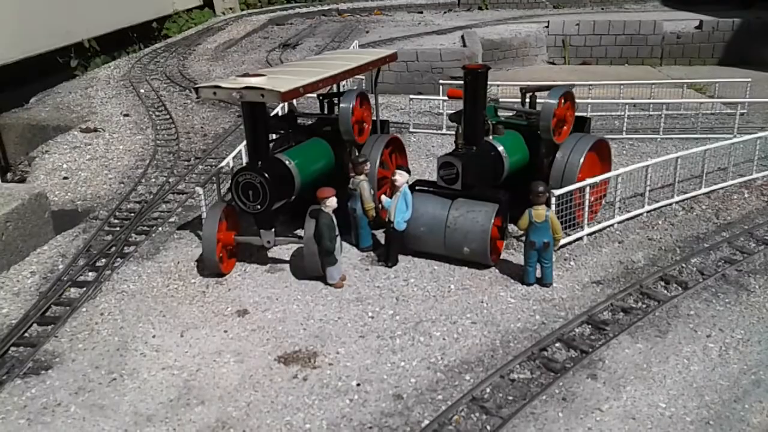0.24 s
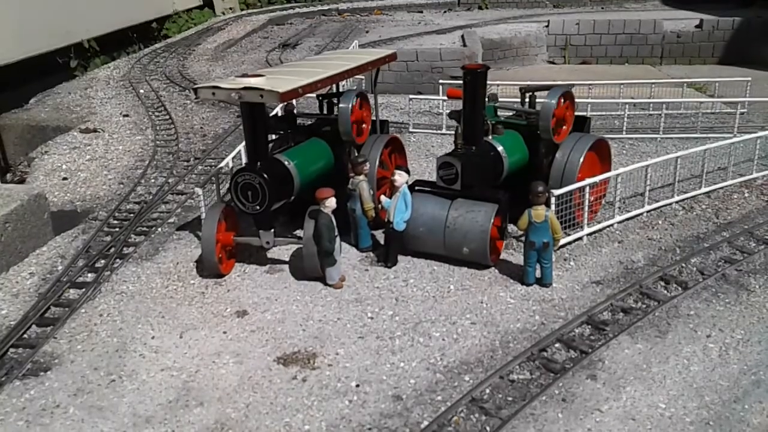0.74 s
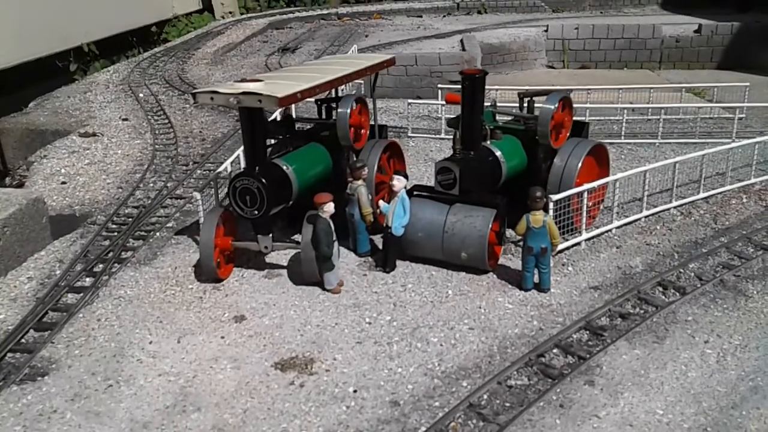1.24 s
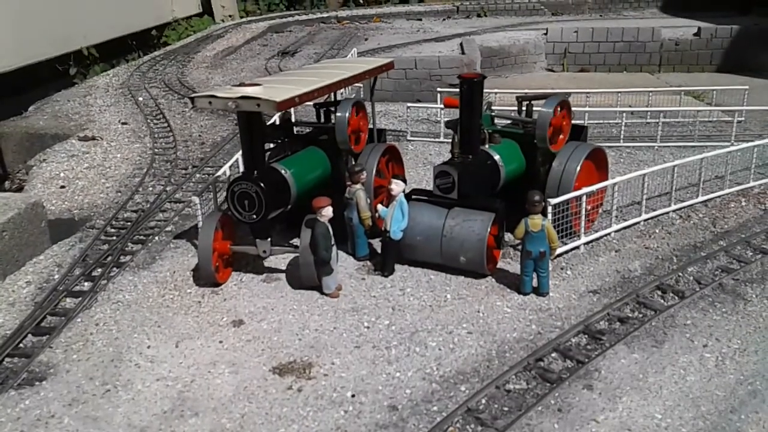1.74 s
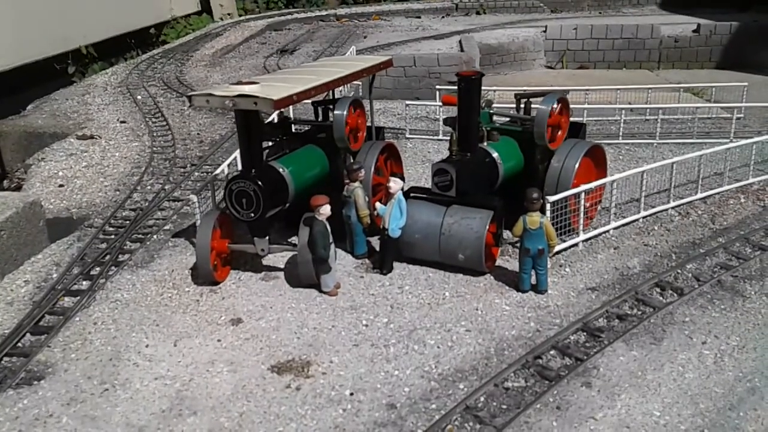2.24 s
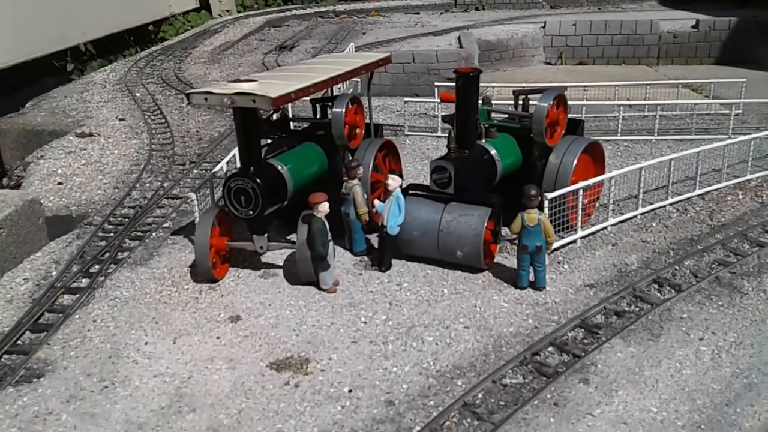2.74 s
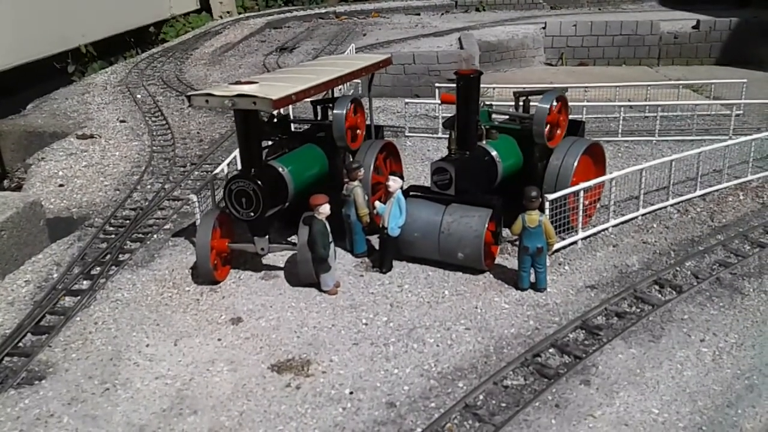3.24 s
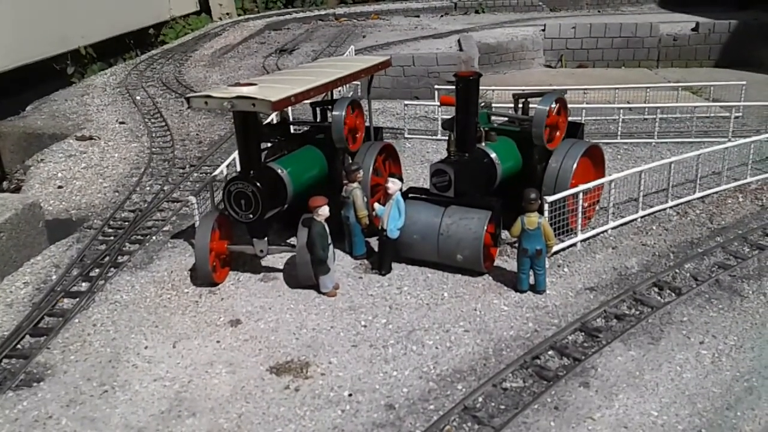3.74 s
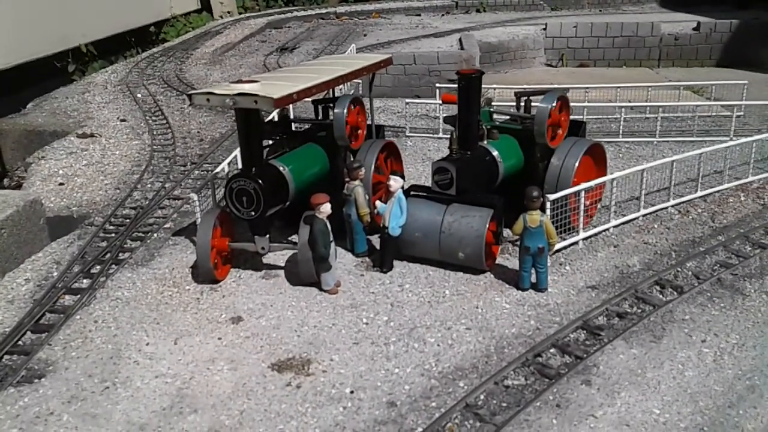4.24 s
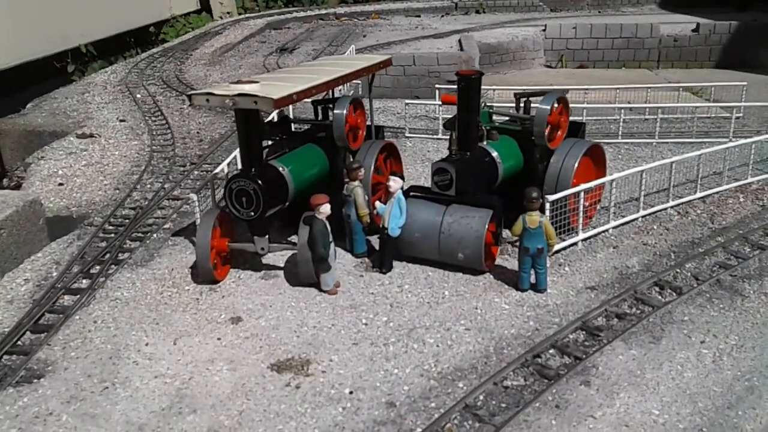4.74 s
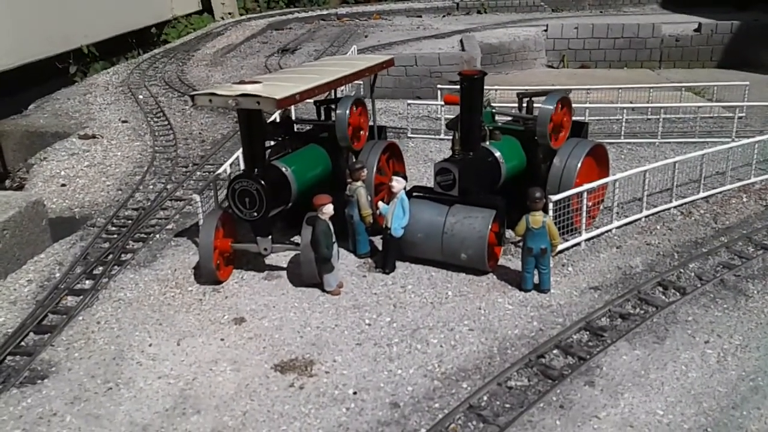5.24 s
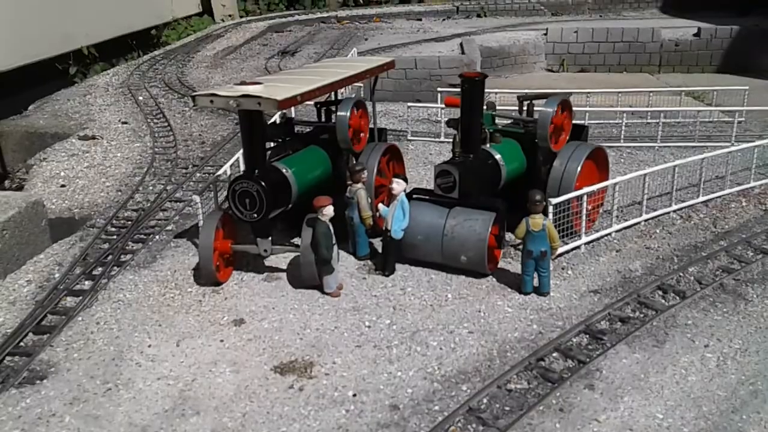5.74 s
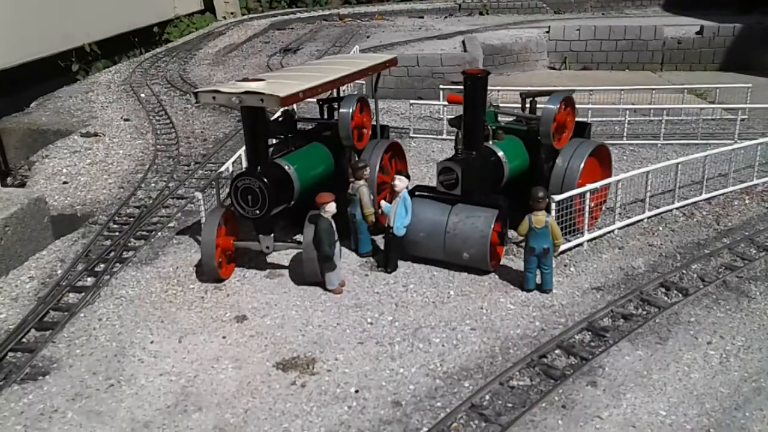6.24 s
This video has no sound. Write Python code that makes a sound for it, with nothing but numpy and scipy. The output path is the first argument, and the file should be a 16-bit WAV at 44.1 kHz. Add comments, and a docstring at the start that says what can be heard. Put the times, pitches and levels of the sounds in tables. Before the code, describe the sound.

Rapid metallic ticking and slower clacking knocks from two model steam engines over faint hiss, with wind thumps growing heavy toward the end.

```python
"""A slow live-steam model knocks and squeaks once a turn beside a fast one that ticks and thuds.
Both idle outdoors on gravel, close to one microphone: short contacts ring their metal parts.
Around them gears hum as sines locked to the flywheel, and steam leaks hiss as coloured noise.
Nearest of all, gusts roll eddies of air over the microphone as trains of pressure bumps."""
import sys
import numpy as np
from scipy import signal
from scipy.fft import rfft, irfft
from scipy.io import wavfile
from scipy.ndimage import uniform_filter1d

SR = 44100
rng = np.random.default_rng(int(sys.argv[2]) if len(sys.argv) > 2 else 0)


def put_to_file(sound):
    """Save the sound as 16-bit audio at rate SR, in the file named by the first command-line argument."""
    columns = np.atleast_2d(sound).T  # one column per channel
    safe = np.clip(columns, -1, 1)
    whole_steps = np.round(safe * 32767)
    wavfile.write(sys.argv[1], SR, whole_steps.astype(np.int16))


N = 285707


def undb(db):
    """Amplitude factor of a level in dB."""
    return 10 ** (np.asarray(db) / 20)


def level(x, db):
    """Scale a signal to an rms level in dB."""
    return x * undb(db) / np.sqrt(np.mean(x ** 2))


def clicks(s, size):
    """A sample-long click at each time."""
    out = np.zeros(N)
    at = np.round(np.asarray(s) * SR).astype(int)
    inside = (at >= 0) & (at < N)
    np.add.at(out, at[inside], size[inside])
    return out


def lag(x, ms):
    """One-pole smoothing that leaves the peak of a click at 1."""
    keep = np.exp(-1 / (SR * ms / 1000))
    return signal.lfilter([1], [1, -keep], x)


def contact(s, size, rise_ms, fall_ms, blow_db):
    """A clean blow, then rough chatter that swells and dies."""
    hits = clicks(s, size)
    swell = lag(hits, fall_ms) - lag(hits, min(rise_ms, .9 * fall_ms))
    chatter = swell * rng.standard_normal(N)
    return chatter + undb(blow_db) * hits


def ring(x, modes):
    """Sum of resonances, neighbours in opposite phase."""
    total = np.zeros(N)
    for k, (hz, width, db) in enumerate(modes):
        mode = signal.lfilter(*signal.iirpeak(hz, hz / width, SR), x)
        total += (-1) ** k * undb(db) * mode
    return total


def walk(rate):
    """Random levels held 1 / rate s and slewed twice; spread near 1."""
    k = int(SR / rate)
    held = np.repeat(rng.standard_normal(N // k + 1), k)
    slewed = uniform_filter1d(uniform_filter1d(held, k), k)
    return 1.3 * slewed[:N]


def bump(ms):
    """Pressure of one eddy as it passes: it builds slowly and breaks fast."""
    t = np.arange(-1500, 1501) / SR
    width_ms = ms * np.where(t < 0, 1.3, .7)
    return np.exp(-.5 * (t * 1000 / width_ms) ** 2)


def port(x):
    """The bass cut of the microphone turns a bump into a swing."""
    return signal.sosfilt(signal.butter(2, 95, "high", fs=SR, output="sos"), x)


def eddies(ms, spread_db, count):
    """A random train of pulls and pushes of one size, at 0 dB rms."""
    s, size, sign = rng.random((count, 3)).T
    strength = undb(-spread_db * np.log(size + 0.008))
    train = clicks(s * N / SR, strength * np.sign(sign - .6))  # more pulls than pushes
    return level(port(signal.fftconvolve(train, bump(ms), "same")), 0)


# breeze at the microphone between the slaps: (time [s], level of the large eddies [dB])
BREEZE = [(0.0, -34), (0.16, -42), (0.34, -41), (0.56, -49.5), (1.06, -51), (1.17, -49), (1.39, -66),
          (2.31, -70), (2.78, -57.5), (3.05, -49), (3.61, -50.5), (3.77, -41), (3.93, -47), (4.15, -52),
          (4.28, -24.5), (4.33, -27), (4.56, -29), (4.74, -30.5), (5.0, -43), (5.18, -28.5), (5.4, -23.5),
          (5.7, -30), (5.83, -39), (6.06, -39.5), (6.26, -35.5), (6.48, -34.5)]
# single strong eddies: (time [s], peak level before the bass cut [dB], size [ms])
SLAPS = [(0.0133, -16.5, 1), (0.137, -17, 0.87), (0.1811, -9.5, 0.69), (0.232, -18, .6), (0.263, -19, 0.37),
         (0.281, -12.5, 1.4), (0.309, -14, 0.85), (0.331, -26, 0.76), (0.8061, -9.5, 1.12),
         (0.783, -20, 1.5), (0.86, -20, 1.3), (0.885, -24, 2.3), (1.09, -28.5, 2), (1.22, -29.5, 1.4),
         (2.309, -30, 2.8), (2.82, -31.5, 3.4), (2.987, -12, 1.94), (3.084, -22, 2.7), (3.38, -25, 1.6),
         (3.6, -24, 2.4), (3.65, -26, 1.3), (3.705, -10, 1.56), (3.725, -17, 2), (3.761, -13.5, 1.18),
         (3.89, -23.5, 2.5), (4.1036, -13.5, 0.6), (4.2245, -7.5, 2.1), (4.3893, -3, 1.1),
         (4.411, -10.5, 1.04), (4.457, -13.5, 1.14), (4.5152, -11.5, 0.43), (4.634, -8, 1.4),
         (4.6557, -4.5, 1.17), (4.723, -5.5, 2.2), (4.76, -12, 1.8), (4.865, -19, 2.6), (4.931, -8.5, 2.5),
         (5.008, -5, 3.9), (5.108, -7, 2.7), (5.2102, -4, 2.1), (5.2307, -4, 1.2), (5.2815, -6.5, 0.86),
         (5.3102, -5, 1.27), (5.325, -5.5, 1.7), (5.373, -7, 1.75), (5.462, -3.5, 0.61),
         (5.471, -5.5, 0.75), (5.5256, -8.5, 1.8), (5.5462, -5.5, 1.33), (5.574, -3, 0.91),
         (5.7064, -6.5, 0.94), (5.7157, -14.5, 0.47), (5.77, -15.5, 1.5), (5.832, -11.5, 1.63),
         (5.919, -19, 2.4), (6.006, -12, 0.9), (6.058, -8.5, 1.27), (6.2228, -12.5, 0.8),
         (6.389, -15.5, 1.4)]
SMALL_DB, CALM_DB = -12.5, -57.5  # small eddies below the large ones in the breeze; their level in still air
# every slap rides on a burst of eddies, finer around a small slap
BURST_DB, BURST_RISE_DB_PER_S, BURST_FALL_DB_PER_S = -13.5, 798, 300
FINE_DB, FINE_DB_PER_DOUBLING = -6.5, -8  # small eddies of a 1 ms slap; change as its size doubles


def wind():
    """Random eddies ride the breeze and swell near each slap, but are turned down for a few ms around it."""
    t = np.arange(N) / SR
    large = undb(np.interp(t, *np.transpose(BREEZE)))
    small = large * undb(SMALL_DB) + undb(CALM_DB)
    pulls, dip = np.zeros((2, N + 3001))
    for at, db, ms in SLAPS:
        i = int(at * SR)
        pulls[i:i + 3001] -= undb(db) * bump(ms)  # the bump peaks 1500 samples in
        dip[i:i + 3001] += bump(7)
        slope = np.where(t < at, BURST_RISE_DB_PER_S, BURST_FALL_DB_PER_S)
        burst = undb(db + BURST_DB - slope * np.abs(t - at))
        fine_db = FINE_DB + FINE_DB_PER_DOUBLING * np.log2(ms)
        large = np.maximum(large, burst)
        small = np.maximum(small, burst * undb(fine_db))
    large_flow = eddies(2.46, 1.2, count=1200) * large
    small_flow = eddies(0.87, 2.16, count=1500) * small
    turned_down = undb(-9 * dip[1500:N + 1500])
    return (large_flow + small_flow) * turned_down + port(pulls[1500:N + 1500])


# colour of the leaking steam: (frequency [Hz], relative level [dB per Hz])
STEAM = [(18, -48), (30, 6), (100, -37), (319, -14), (400, -15.5), (620, -6.5), (730, -15), (1040, -10.5),
         (1150, -1), (1270, -11), (1630, -8.5), (2200, -18), (2900, -18), (5040, -11.5), (5900, -11.5),
         (7270, -3), (8740, -17.5), (11000, -28), (16000, -29)]
STEAM_DB = -44.5  # rms


def steam():
    """Leaks hiss unsteadily and spit droplets: noise with a wandering level and short bursts, coloured."""
    place, luck = rng.random((1500, 2)).T
    drop_db = -3 * np.log(luck + 0.011) - 14.5
    spit = lag(clicks(place * N / SR, undb(drop_db)), 2.55)
    jet = rng.standard_normal(N) * (undb(0.48 * walk(30)) + spit)
    hz, db = np.transpose(STEAM)
    bins_hz = np.fft.rfftfreq(N, 1 / SR)
    colour = undb(np.interp(np.log(bins_hz + 1), np.log(hz), db))
    return level(irfft(rfft(jet) * colour, N), STEAM_DB)


# run of the fast engine: (time [s], flywheel turns done [turns])
FAST_TURNS = [(0.0, -0.218), (0.4, 8.819), (1.2, 26.77), (1.6, 35.773), (2.4, 53.83), (3.2, 71.928),
              (4.0, 90.059), (5.2, 117.01), (5.6, 126.079), (6.0, 135.014), (6.5, 146.258)]
# its blows into the frame within one turn: (part of the turn [turns], level [dB])
FAST_BLOWS = [(-.17, -17), (-.065, -1), (.005, -6), (.13, -13), (.36, -17), (.55, -18)]
# its gear hums: (hums per turn [1/turn], mean level [dB])
GEAR = [(14, -61), (26, -67), (29, -67), (41, -68), (62, -65)]
# what its valve rings with: (frequency [Hz], width [Hz], level [dB])
FAST_VALVE = [(4180, 860, -11.5), (5740, 900, -5.5), (6910, 290, 6), (7604, 210, 8.5), (7828, 290, 4),
              (9000, 2000, -20), (11360, 300, -16), (14000, 680, -25)]
# what its frame rings with: (frequency [Hz], width [Hz], level [dB])
FAST_FRAME = [(123, 110, 0), (193, 99, -1.5), (552, 19, -6), (656, 8.3, -13), (841, 30, 1), (927, 7.6, -22),
              (1124, 35.6, 9.5), (1205.5, 61, 3), (1380, 18, -9), (1451, 108, -4.5), (1642, 72, -3.5),
              (1902, 127, -7.5), (3170, 67, -17)]


def fast_engine():
    """The valve ticks and rebounds; rod and crank strike the frame nearly alike every turn; the gears hum."""
    s, turns = np.transpose(FAST_TURNS)
    whole = np.arange(np.floor(turns[0]), turns[-1] + 1)
    chance = rng.standard_normal((len(whole), 3 + len(FAST_BLOWS))).T
    scatter_db = 1.2

    def when(part):
        """Times [s] of one part of every turn; -1 outside the run."""
        return np.interp(whole + part, turns, s, left=-1, right=-1)

    tick_db = -19.5 + 0.87 * chance[1]
    tick = contact(when(-0.14) + 0.00051 * chance[0], undb(tick_db), 0.19, 2.04, blow_db=3)
    rebound_db = -24.0 + 2 * scatter_db * chance[2]
    rebound = contact(when(-.045), undb(rebound_db), 0.49, 1.7, blow_db=9.5)
    blows = np.zeros(N)
    for (part, db), c in zip(FAST_BLOWS, chance[3:]):
        blows += clicks(when(part), undb(db + scatter_db * c))

    angle = 2 * np.pi * np.interp(np.arange(N) / SR, s, turns)
    gear = np.zeros(N)
    for order, db in GEAR:
        gear += np.sqrt(2) * undb(db + 0.26 * walk(3)) * np.sin(order * angle)
    return ring(tick + rebound, FAST_VALVE) + ring(blows, FAST_FRAME) + gear


# run of the slow engine, which knocks at each whole turn: (time [s], flywheel turns done [turns])
SLOW_TURNS = [(-0.035, -1), (0.3545, 5), (0.998, 15), (1.9455, 30), (2.572, 40), (2.887, 45), (3.206, 50),
              (3.851, 60), (4.4955, 70), (4.822, 75), (5.153, 80), (6.504, 100)]
# its harder knocks: (time [s], level above the rest [dB])
HARD_KNOCKS = [(0.095, 1), (1.441, 0.5), (1.631, 1), (2.008, 2.5), (2.698, 1.5), (3.915, 2), (4.045, 3),
               (5.22, 3), (6.167, 1.5)]
# extra squeaks of its rod, on top of the regular ones: (time [s], level [dB])
EXTRA_SQUEAKS = [(0.452, -15), (0.966, -8.5), (1.092, -17), (1.473, -14), (1.599, -6.5), (2.855, -15),
                 (4.333, -11), (5.186, -13), (5.796, -11)]
# what its frame rings with: (frequency [Hz], width [Hz], level [dB])
SLOW_FRAME = [(1160, 73, -1), (2145, 69, -10), (2590, 240, -15.5), (3301, 84, -3.5), (3654, 40, -5),
              (4110, 236, -6.5), (5164, 310, 3), (6210, 266, 1.5), (6580, 310, 4.5), (7316, 288, 6.5),
              (8263, 600, -2.5), (8133, 720, -2), (9760, 550, -8), (11640, 230, -15.5), (12900, 440, -24),
              (14800, 1200, -33)]
# what its gland rings with: (frequency [Hz], width [Hz], level [dB])
SLOW_GLAND = [(2538, 71, -6.5), (4720, 120, -2), (7350, 420, -8.5)]
# levels before the ringing
KNOCK_DB, KNOCK_GROWS_DB_PER_S, KNOCK_SCATTER_DB = -16.5, 0.245, 0.53
KNOCK_JITTER_S = .0005
SQUEAK_DB, SQUEAK_SCATTER_DB = -15, 1


def slow_engine():
    """The loose crank knocks, then rattles out more softly; the rod squeaks in its gland on the way back."""
    at, turns = np.transpose(SLOW_TURNS)
    whole = np.arange(turns[0], turns[-1] + 1)
    chance = rng.standard_normal((len(whole), 5)).T
    s = np.interp(whole, turns, at) + KNOCK_JITTER_S * chance[3]
    knock_db = KNOCK_DB + KNOCK_GROWS_DB_PER_S * s + KNOCK_SCATTER_DB * chance[2]
    for hard_s, db in HARD_KNOCKS:
        knock_db[np.argmin(np.abs(s - hard_s))] += db
    knock = contact(s, undb(knock_db), .2, 1.9, blow_db=13)

    rattle_s = s + 0.0034 + .001 * chance[0]
    rattle_db = knock_db - 10.5 + 1.74 * chance[1]
    rattle = contact(rattle_s, undb(rattle_db), 0.7, 7.67, blow_db=16)
    rattle = lag(rattle, 0.06)  # softer contact, less top

    extra_s, extra_db = np.transpose(EXTRA_SQUEAKS)
    squeak_s = np.append(np.interp(whole + .5, turns, at), extra_s)
    squeak_db = np.append(SQUEAK_DB + SQUEAK_SCATTER_DB * chance[4], extra_db)
    squeak = contact(squeak_s, undb(squeak_db), 2.07, 5.0, blow_db=-20)
    return ring(knock + rattle, SLOW_FRAME) + ring(squeak, SLOW_GLAND)


def scene():
    """Both engines, their steam and the wind reach one microphone, alike in both channels."""
    mono = wind() + steam() + fast_engine() + slow_engine()
    return np.array([mono, mono])


TOP_HZ = 15750


def record(dry):
    """A faint hiss, mostly treble, has opposite signs in the two channels; the top is cut."""
    treble = signal.butter(1, 5000, "high", fs=SR, output="sos")
    hiss = level(signal.sosfilt(treble, rng.standard_normal(N)), -66)
    both = dry + hiss * np.array([[1], [-1]])
    top_cut = signal.ellip(8, .2, 60, TOP_HZ, fs=SR, output="sos")
    return signal.sosfilt(top_cut, both)


dry = scene()
out = record(dry)
put_to_file(out)
```